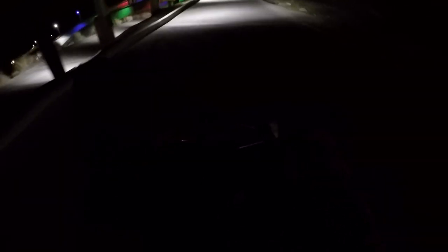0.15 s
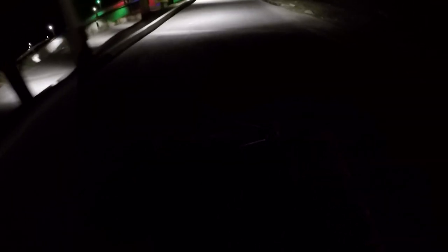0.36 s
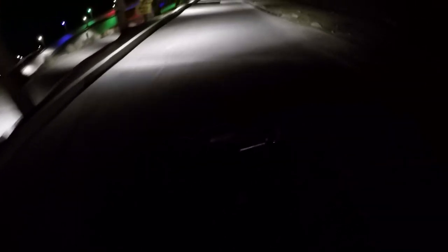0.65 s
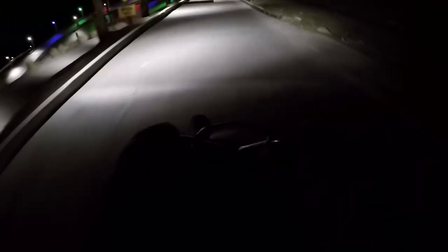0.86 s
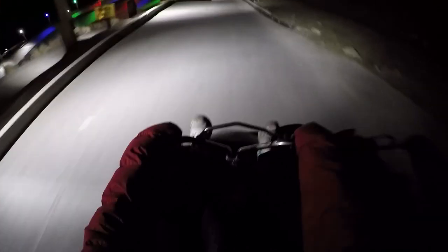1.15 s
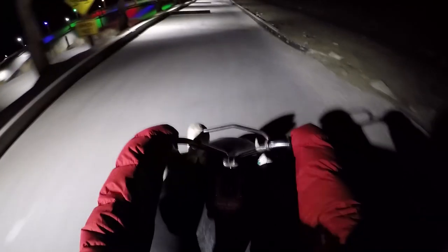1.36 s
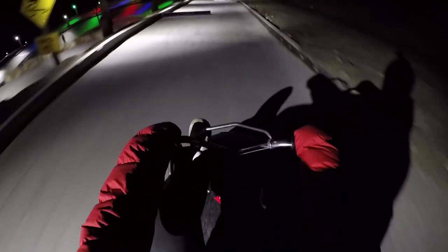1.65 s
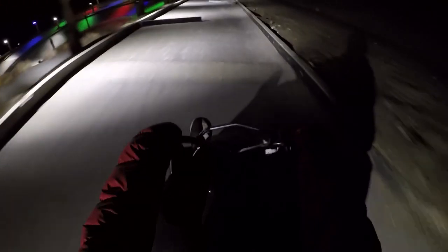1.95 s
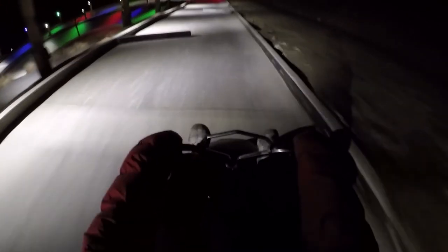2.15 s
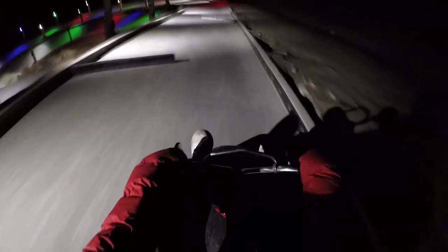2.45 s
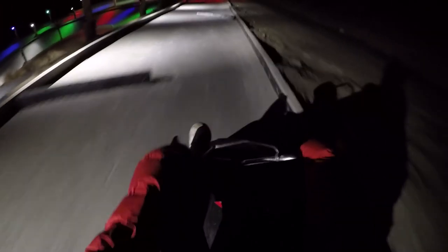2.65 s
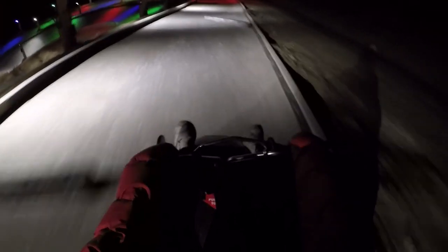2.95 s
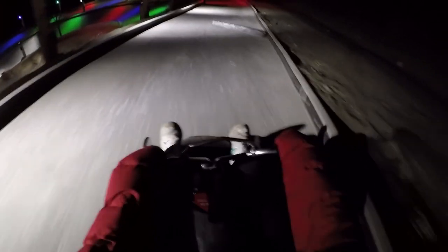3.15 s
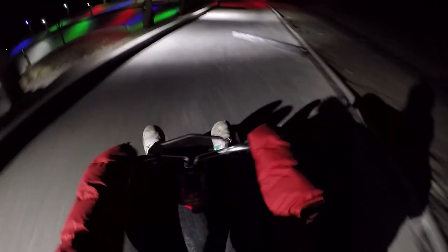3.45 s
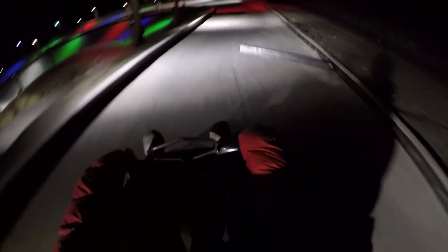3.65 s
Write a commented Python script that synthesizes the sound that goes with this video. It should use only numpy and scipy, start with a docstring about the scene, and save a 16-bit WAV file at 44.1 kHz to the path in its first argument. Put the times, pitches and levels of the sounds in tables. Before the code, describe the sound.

Small cart rolling fast on concrete, deep hollow rumble with sharp irregular rattling clacks and wind

```python
"""A luge cart rolls fast down a concrete track, heard from the rider's seat.
From the start, air buffets the microphone, wheels rumble through the hollow tub and grit crackles and hisses.
A loose fitting clacks again and again, hardest from about 1 to 1.4 s, among chassis knocks and dry scuffs.
Noise shaped in pitch makes the rolling, wavering tones the booms over bumps, ringing modes the blows.
Near 2.5 s the rumble dips briefly and surges back; later the clacks soften and the treble hiss thins.
"""
import sys
import numpy as np
from scipy import signal
from scipy.fft import rfft, irfft
from scipy.io import wavfile
from scipy.ndimage import uniform_filter1d, minimum_filter1d

SR = 44100
rng = np.random.default_rng(int(sys.argv[2]) if len(sys.argv) > 2 else 0)


def transcribe(u):
    """Save the signal u as a 16-bit wav file named by the first command-line argument.

    u: samples, shape (n,) or (channels, n), limited to [-1, 1]; the rate is SR.
    q: integer samples, one column per channel.
    """
    v = np.clip(np.atleast_2d(u).T, -1, 1)
    q = np.round(v * 32767).astype(np.int16)
    wavfile.write(sys.argv[1], SR, q)


N = 167580  # samples, 3.8 s

# All dB columns are relative: the trims and curves used with them add to them.
# wind on the microphone over time: start_s, level_db
GUST_CURVE = [(0, -20.5), (.3, -22.5), (.65, -22.5), (.92, -16.5), (1.15, -22), (1.45, -22), (2, -22.5),
              (2.45, -25), (3, -23.5), (3.8, -22.5)]
# spectrum of the wind: pitch_hz, level_db
WIND_SPECTRUM = [(8, -18), (22, -0.5), (40, -3.5), (62, 0), (90, -5.5), (140, -14.5), (300, -25.5),
                 (900, -68.5)]

# rolling over time: start_s, rumble_db, roar_db
ROLL_CURVE = [(0, -21.5, -32.5), (.77, -21, -34), (1.2, -20, -33), (1.42, -19, -30), (1.54, -21.5, -35),
              (1.95, -18, -33.5), (2.15, -17.5, -34), (2.44, -17, -34), (2.5, -27, -37.5), (2.55, -14, -32),
              (2.62, -20.5, -32.5), (3.1, -18.5, -30.5), (3.54, -21.5, -31), (3.8, -16, -33)]
# spectrum of the low rumble: pitch_hz, level_db (per Hz)
RUMBLE_SPECTRUM = [(40, -41.5), (100, -2), (150, -0.5), (230, -0.5), (310, -3.5), (420, -8.5), (520, -13.5),
                   (650, -39), (1200, -63)]
# spectrum of the higher roar: pitch_hz, level_db (per Hz)
ROAR_SPECTRUM = [(300, -26.5), (480, 2), (600, 2), (720, 3.5), (880, -0.5), (1050, -6.5), (1300, -14.5),
                 (2000, -25.5), (4000, -50.5)]
RUMBLE_DB, ROAR_DB = -2.5, -2
RUMBLE_LUMPS_DB, RUMBLE_LUMPS_HZ = 1.26, 9.3  # depth and rate of the unevenness
# resonances of the tub under steady rolling: pitch_hz, width_hz, level_db
TUB_RESONANCES = [(151.8, 52.5, -26.5), (245.6, 74, -26.5), (507, 79, -41)]
# how strongly the rolling drives those resonances: start_s, level_db
TUB_DRIVE_CURVE = [(0, 1), (.6, -1.5), (1.25, 1.5), (1.6, -2.5), (2.1, 1.5), (2.5, -1.5), (2.7, 0.5),
                   (3.1, 3.5), (3.45, -0.5), (3.8, 3.5)]

# rough stretches that make the tub boom: start_s, length_s, level_db, pitch_hz
BUMP_EVENTS = [(.07, 0.066, -24.5, 140), (.545, 0.054, -21, 254.7), (.665, 0.039, -17.5, 148),
               (1.0, 0.019, -19, 346), (1.142, 0.019, -21, 445), (1.195, 0.045, -15, 159.6),
               (1.255, .035, -26, 237), (1.325, 0.016, -21, 471), (1.367, 0.048, -13.5, 265.7),
               (1.398, 0.022, -29, 422), (1.913, 0.024, -16, 242), (2.262, 0.049, -15.5, 174.6),
               (2.312, 0.027, -34, 436), (2.394, 0.094, -15, 267.4), (2.533, 0.047, -21, 340),
               (2.585, 0.047, -21, 137), (2.645, .06, -20.5, 207), (2.985, .05, -21, 150),
               (3.075, 0.039, -15, 235.6), (3.195, 0.026, -20.5, 218), (3.3, 0.097, -18.5, 157.6),
               (3.445, 0.046, -19, 161), (3.56, 0.045, -16, 165.3), (3.632, 0.038, -15, 157)]
# spectrum of the wheels' thud on a bump: pitch_hz, level_db
THUD_SPECTRUM = [(100, -18), (180, 2.5), (330, 7.5), (520, -6.5), (650, -18.5), (1000, -28)]
BOOM_WANDER_RATIO, THUD_DB = 0.051, -11  # rms pitch wander as a share of the pitch; thud against boom

# grit under the wheels over time: start_s, level_db
SURFACE_CURVE = [(0, -47.5), (.3, -47.5), (.55, -41.5), (.9, -46), (1.3, -44.5), (1.6, -46.5), (2.3, -45),
                 (2.45, -43.5), (2.51, -52.5), (2.65, -43), (2.9, -43.5), (3.37, -45.5), (3.8, -42)]
# treble hiss over time: start_s, level_db
TREBLE_CURVE = [(0, -66), (.3, -66), (.6, -63), (.95, -66), (1.35, -63.5), (1.5, -65), (1.57, -70),
                (2.3, -68.5), (2.46, -71), (2.52, -76), (3.1, -79), (3.8, -80)]
# spectrum of grit and stones: pitch_hz, level_db
GRIT_SPECTRUM = [(600, -8), (1100, 4.5), (1500, 3.5), (2000, -4), (2200, -1.5), (2600, -8), (3450, -16),
                 (4000, -7.5), (4550, -15.5), (5200, -29.5), (6600, -25.5), (7200, -55)]
# spectrum of the hiss: pitch_hz, level_db
HISS_SPECTRUM = [(1500, -5.5), (3000, -10), (4100, 3), (5200, 2), (5800, 7.5), (6500, 0.5), (7300, -2),
                 (8600, 1.5), (10000, -4), (11500, -16), (14000, -21)]
GRIT_DB, HISS_DB = 1.5, 4.5
GRAINS_PER_S, GRAIN_SPREAD_DB = 4000, -1  # negative spread: a few grains fall below the rest
STONES_PER_S, STONE_SPREAD_DB, STONE_S, STONE_DB = 190, 2.8, .0005, .5

# the louder scuffs: start_s, level_db
SCRAPE_EVENTS = [(0.049, 5.5), (0.074, 0), (.157, 4.5), (0.284, 0), (0.363, 0), (.993, 3.5), (1.202, 7),
                 (1.207, 4), (1.223, 6), (1.262, 2), (1.305, 8), (1.408, 4.5), (1.972, 1.5), (2.277, 5),
                 (2.445, 7.5), (2.461, 6), (3.088, 3), (3.574, 1.5)]
# spectrum of a scuff: pitch_hz, level_db
SCUFF_SPECTRUM = [(500, -8.5), (1200, 0.5), (2500, -3), (4200, 2), (5500, -6), (6900, -10), (7700, -23.5),
                  (10000, -47)]
SCUFFS_PER_S, SCUFF_S, SCUFF_DB, SMALL_SCUFF_DB = 48, .0022, -42.5, 0
SCUFF_FOLLOW = .6  # how far the small scuffs follow the treble curve, as a power

# dull knocks of the chassis: start_s, level_db
KNOCK_EVENTS = [(.042, -2), (.173, -1.5), (.28, -2), (.411, -1), (.662, -3), (.993, -2), (1.082, -2),
                (1.103, -3.5), (1.272, -8.5), (1.996, 0.5), (2.234, -1), (2.321, 0.5), (2.429, -4),
                (2.92, -1), (3.008, -6), (3.23, -7.5)]
# what the chassis rings with: pitch_hz, height_db, t60_s
CHASSIS_MODES = [(707, 15.8, 0.034), (785, 22.7, 0.033), (833, 16.6, 0.066)]
# spectrum of the rattle in a knock: pitch_hz, level_db
KNOCK_SPECTRUM = [(350, -9), (550, 1), (850, 0.5), (1050, -12), (1700, -4.5), (2600, -24)]
KNOCK_DB, KNOCK_RATTLE_DB, KNOCK_S = -1.5, -4.5, 0.011

# the loose fitting strikes its stop: start_s, level_db
CLACK_EVENTS = [(0.0444, -7.5), (0.1348, -6), (.211, -5), (0.268, -16.5), (0.308, -8.5), (0.442, -12),
                (0.526, -13), (0.5584, -13), (0.573, -10.5), (0.5985, -9.5), (0.6556, -10), (.703, -7.5),
                (.7555, -4), (0.771, -10), (0.8477, -3.5), (0.875, -12), (1.009, -0.5), (1.0256, -8),
                (1.074, -12.5), (1.1496, -1), (1.219, -12.5), (1.331, -1.5), (1.346, -14.5), (1.39, -9.5),
                (1.4499, -4), (1.5026, -10), (1.563, -17), (1.7087, -6.5), (1.7424, -22), (1.7745, -10),
                (1.8462, -6), (1.918, -4), (1.944, -15), (2.1078, -5.5), (2.1727, -1.5), (2.241, -5),
                (2.2952, -4), (2.3604, -3.5), (2.376, -10), (2.5603, -8.5), (2.6242, -17.5), (2.774, -8),
                (2.8782, -7), (2.9996, -11.5), (3.0649, -13.5), (3.2558, -9.5), (3.322, -12),
                (3.3874, -10.5), (3.4481, -12), (3.575, -12.5), (3.7052, -13), (3.7876, -7.5)]
# what the fitting rings with: pitch_hz, height_db, t60_s
FITTING_MODES = [(1503, 21.5, 0.012), (1758, 16, 0.0094), (2144, 20, 0.022), (2230, -12.5, 0.012),
                 (2860, 3.5, 0.0053), (4024, 11, 0.014), (4250, -4.5, 0.014), (5600, -18.5, 0.0046),
                 (6510, 1.5, 0.039), (7660, -10.5, 0.0013), (8620, -9, .006), (9950, -9.5, 0.0022),
                 (11800, -15, .002)]
MODE_SPREAD_DB, MODE_DETUNE_RATIO = 1.03, .007  # how each blow differs, also on the chassis
CLACK_DB, CLACK_LOW_HZ, CLACK_TOP_HZ = -1, 1275, 8400  # top edge of a clack listed at 0 dB
TOP_HZ_PER_DB = 275.5  # a softer blow is duller
LEAD_IN_S, LEAD_IN_DB = 0.001136, -12  # a faint copy of the blow just ahead of it softens its attack
CONTACT_S, CONTACT_DB = .0011, -9  # gritty contact
RATTLE_S, RATTLE_DB, RATTLE_PER_S, RATTLE_TOP_HZ = .009, -13, 900, 3000
CHATTER_PER_S, CHATTER_DB, CHATTER_FOLLOW = 70, -26, .8  # follows the surface curve, as a power
BEND_DELAY_S, BEND_HZ = 0.000741, 1510  # travel time of bending waves at this pitch

EDGE_HZ = 15200  # top of the finished sound


def amp(db):
    """Gain of a level in dB."""
    return 10 ** (np.asarray(db) / 20)


def unit(x):
    """Scales x to rms 1."""
    return x / np.sqrt(np.mean(x ** 2) + 1e-20)


def add(mix, start_s, sound):
    """Lays a sound into the mix at its start time."""
    part = mix[max(round(start_s * SR), 0):][:len(sound)]
    part += sound[:len(part)]


def level(table, column):
    """Gain over time from one dB column of a curve."""
    rows = np.array(table)
    return amp(np.interp(np.arange(N) / SR, rows[:, 0], rows[:, column]))


def colour(x, points):
    """Gives x a spectrum, dying away above its last point, and rms 1."""
    hz, db = np.transpose(points)
    f = np.fft.rfftfreq(N, 1 / SR)
    shape = amp(np.interp(np.log(f + 1), np.log(hz), db))
    shape /= np.maximum(f / hz[-1], 1) ** 6
    return unit(irfft(rfft(x) * shape, N))


def drift(rate_hz):
    """Slow random wander of rms 1."""
    f = np.fft.rfftfreq(N, 1 / SR)
    spectrum = rfft(rng.standard_normal(N)) / (1 + (f / rate_hz) ** 4)
    return unit(irfft(spectrum, N))


def band(x, low_hz, top_hz, order=2):
    """Keeps the band between two pitches."""
    edges = [low_hz, min(top_hz, SR / 2 - 1)]
    return signal.sosfilt(signal.butter(order, edges, "band", fs=SR, output="sos"), x)


def ring(modes):
    """One blow on a set of dying sine modes, a little different each time."""
    t = np.arange(SR // 20) / SR
    out = np.zeros(len(t))
    variations = rng.standard_normal((len(modes), 2))
    for (hz, height_db, t60), (louder, higher) in zip(modes, variations):
        damping = np.log(1000) / t60
        # scaled so that height_db is the height of the resonance peak
        height = amp(height_db + MODE_SPREAD_DB * louder) * 2 * damping / SR
        pitch = hz * (1 + MODE_DETUNE_RATIO * higher)
        out += height * np.exp(-damping * t) * np.sin(2 * np.pi * pitch * t)
    return out


def impacts(per_s, spread_db, limit=4.8):
    """A random train of impulses of uneven size."""
    hits = rng.random(N) < per_s / SR
    size = np.minimum(rng.exponential(1, N), limit)
    return hits * amp(spread_db * (size - 5.5))


def bursts(train, decay_s):
    """Turns each impulse into a dying puff of noise."""
    envelope = signal.lfilter([1], [1, -np.exp(-1 / (decay_s * SR))], train)
    return envelope * rng.standard_normal(N)


def flurry(x, decay_s, per_s):
    """Repeats a blow as a dying flurry of tiny contacts."""
    t = np.arange(SR // 20) / SR
    sizes = rng.standard_normal(len(t)) * np.exp(-t / decay_s)
    taps = sizes * (rng.random(len(t)) < per_s / SR)
    return signal.fftconvolve(x, taps / (np.linalg.norm(taps) + 1e-12))


def bend(x):
    """Spreads a blow as it travels through the frame: bending waves are slower at low pitch."""
    f = np.fft.rfftfreq(len(x), 1 / SR)
    phase = -4 * np.pi * BEND_DELAY_S * np.sqrt(f * BEND_HZ)
    return irfft(rfft(x) * np.exp(1j * phase), len(x))


def wind():
    """Low buffeting of air on the microphone: low noise with a moving level."""
    return colour(rng.standard_normal(N), WIND_SPECTRUM) * level(GUST_CURVE, column=1)


def tub_resonances():
    """Noise through broad resonances of the hollow tub."""
    f = np.fft.rfftfreq(N, 1 / SR)
    out = np.zeros(N)
    for hz, width_hz, db in TUB_RESONANCES:
        spectrum = rfft(rng.standard_normal(N)) / (1 + (2 * (f - hz) / width_hz) ** 2)
        out += amp(db) * unit(irfft(spectrum, N))
    return out * level(TUB_DRIVE_CURVE, column=1)


def rolling():
    """Wheel noise: an uneven rumble with the tub's resonances, and a flickering roar above."""
    rumble = colour(rng.standard_normal(N), RUMBLE_SPECTRUM)
    rumble *= amp(RUMBLE_DB) * level(ROLL_CURVE, column=1)
    flicker = amp(1.9 * drift(27))
    roar = colour(rng.standard_normal(N) * flicker, ROAR_SPECTRUM)
    roar *= amp(ROAR_DB) * level(ROLL_CURVE, column=2)
    lumps = amp(RUMBLE_LUMPS_DB * drift(RUMBLE_LUMPS_HZ))
    return roar + lumps * (rumble + tub_resonances())


def booms():
    """Over each rough patch the wheels thud and the tub swells at a wavering pitch."""
    tone, swell, wander = np.zeros(N), np.zeros(N), drift(36.0)
    for start_s, length_s, db, hz in BUMP_EVENTS:
        shape = amp(db) * signal.windows.tukey(int(length_s * SR), .7)
        local_wander = np.roll(wander, -round(start_s * SR))[:len(shape)]
        pitch = hz * (1 + BOOM_WANDER_RATIO * local_wander)
        add(tone, start_s, shape * np.sqrt(2) * np.sin(2 * np.pi * np.cumsum(pitch) / SR))
        add(swell, start_s, shape)
    thud = swell * amp(THUD_DB) * colour(rng.standard_normal(N), THUD_SPECTRUM)
    return tone + thud


def concrete():
    """Dense grains of grit, ticks of small stones and a fine hiss under the wheels."""
    grains = impacts(GRAINS_PER_S, GRAIN_SPREAD_DB) * rng.choice([-1, 1], N)
    grit = amp(GRIT_DB) * colour(grains * amp(2.47 * drift(30)), GRIT_SPECTRUM)
    ticks = bursts(impacts(STONES_PER_S, STONE_SPREAD_DB, limit=3.2), STONE_S)
    stones = amp(STONE_DB) * colour(ticks, GRIT_SPECTRUM)
    flickering_noise = rng.standard_normal(N) * amp(3.1 * drift(35))
    hiss = amp(HISS_DB) * colour(flickering_noise, HISS_SPECTRUM)
    return (grit + stones) * level(SURFACE_CURVE, column=1) + hiss * level(TREBLE_CURVE, column=1)


def scuffs():
    """Brief dry slips of the wheels, each a puff of noise: many small ones and a few louder."""
    follow = unit(level(TREBLE_CURVE, column=1) ** SCUFF_FOLLOW)
    slips = amp(SMALL_SCUFF_DB) * impacts(SCUFFS_PER_S, 0.85) * follow
    for start_s, db in SCRAPE_EVENTS:
        add(slips, start_s, amp([db]))
    puffs = bursts(slips, SCUFF_S)
    return amp(SCUFF_DB) * np.std(puffs) * colour(puffs, SCUFF_SPECTRUM)


def chassis():
    """Short hollow knocks from a few ringing modes, each with a dull rattle of dying noise."""
    knocks, shake = np.zeros(N), np.zeros(N)
    t = np.arange(SR // 20) / SR
    for start_s, db in KNOCK_EVENTS:
        add(knocks, start_s, amp(KNOCK_DB + db) * ring(CHASSIS_MODES))
        add(shake, start_s, amp(db) * np.exp(-t / KNOCK_S))
    rattle = colour(shake * rng.standard_normal(N), KNOCK_SPECTRUM)
    rattle *= amp(KNOCK_RATTLE_DB) * np.std(knocks)
    return band(knocks, low_hz=450, top_hz=2600) + rattle


def chatter():
    """Faint random taps ring the fitting, following the level of the surface."""
    follow = unit(level(SURFACE_CURVE, column=1) ** CHATTER_FOLLOW)
    taps = impacts(CHATTER_PER_S, 2.1) * follow
    ringing = signal.oaconvolve(taps, ring(FITTING_MODES))[:N]
    return amp(CHATTER_DB) * band(ringing, CLACK_LOW_HZ, top_hz=5200, order=4)


def fitting():
    """Sharp clacks, brighter when harder: a faint lead-in, a gritty blow, a short rattle, over chatter."""
    out = chatter()
    for start_s, db in CLACK_EVENTS:
        top_hz = max(CLACK_TOP_HZ + TOP_HZ_PER_DB * db, 2 * CLACK_LOW_HZ)
        blow = amp(CLACK_DB + db) * band(ring(FITTING_MODES), CLACK_LOW_HZ, top_hz, order=3)
        # a possible contact on every sample makes it gritty
        contact = band(flurry(blow, CONTACT_S, SR), low_hz=2600, top_hz=15000)
        rattle = flurry(blow, RATTLE_S, RATTLE_PER_S)
        rattle = band(rattle, CLACK_LOW_HZ, RATTLE_TOP_HZ, order=1)
        add(out, start_s - LEAD_IN_S, amp(LEAD_IN_DB) * blow)
        add(out, start_s, blow)
        add(out, start_s, amp(CONTACT_DB) * contact)
        add(out, start_s, amp(RATTLE_DB) * rattle)
    return bend(out)


def scene():
    """Everything on the moving cart, in one channel."""
    background = wind() + rolling() + booms()
    wheels = concrete() + scuffs()
    return (background + wheels + chassis() + fitting())[None]


def record(dry):
    """A smooth limiter holds the peaks; then a steep filter removes the extreme treble."""
    needed_gain = np.minimum(1, amp(-6) / (abs(dry) + 1e-9))
    held_gain = minimum_filter1d(needed_gain, size=401)
    gain = uniform_filter1d(uniform_filter1d(held_gain, size=201), size=201)
    lowpass = signal.firwin(511, EDGE_HZ, window=("kaiser", 9), fs=SR)
    return signal.oaconvolve(dry * gain, lowpass[None], "same")


dry = scene()
out = record(dry)
transcribe(out)
```